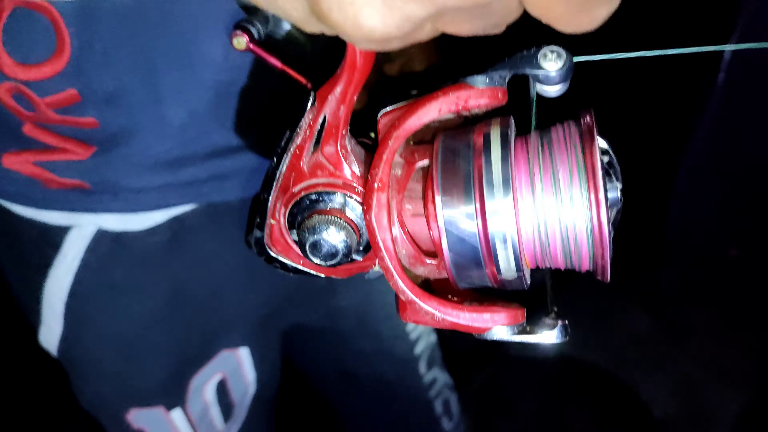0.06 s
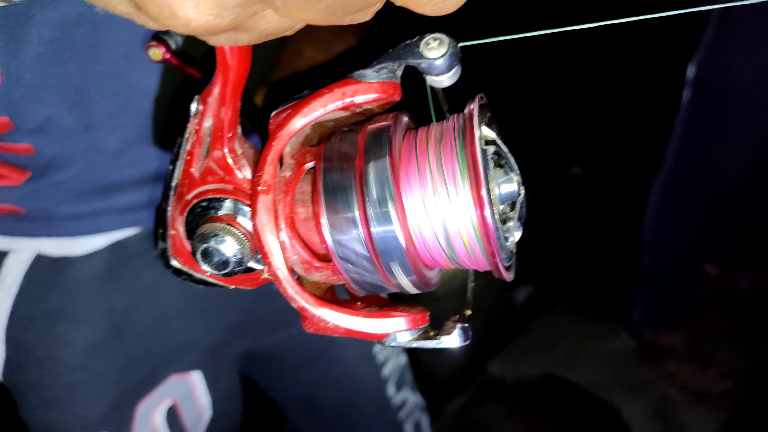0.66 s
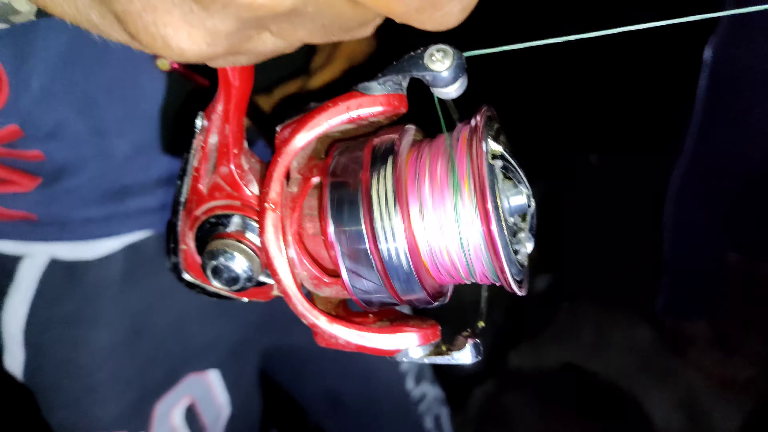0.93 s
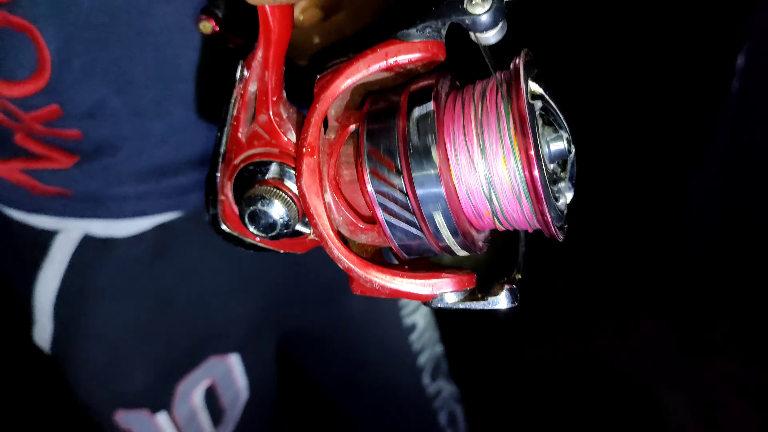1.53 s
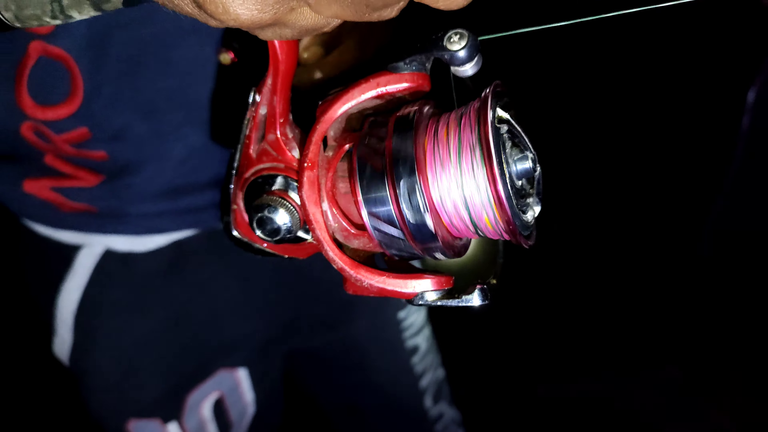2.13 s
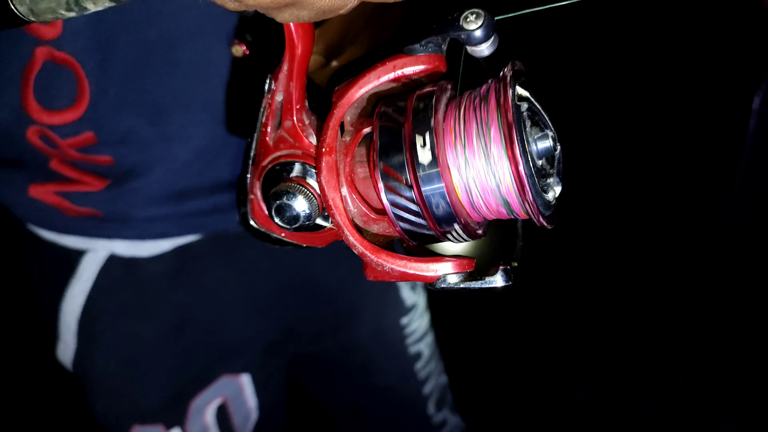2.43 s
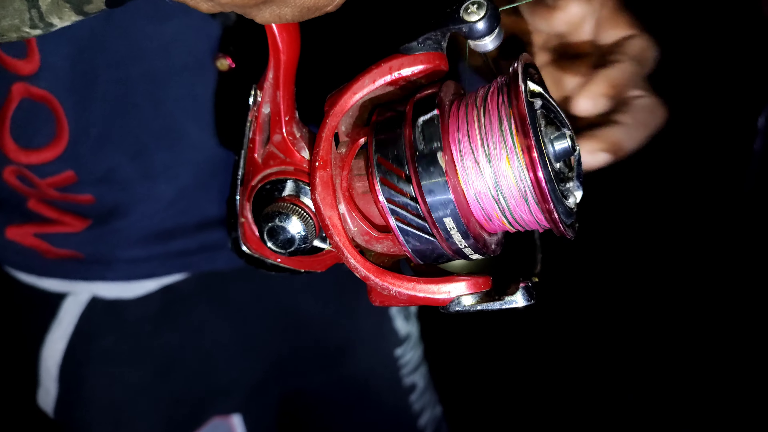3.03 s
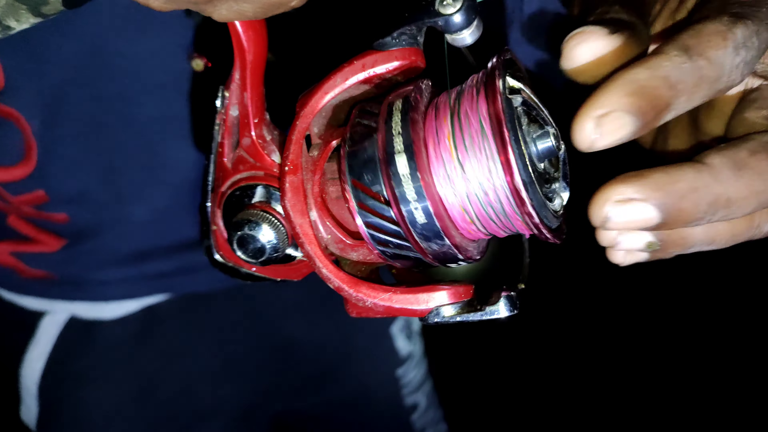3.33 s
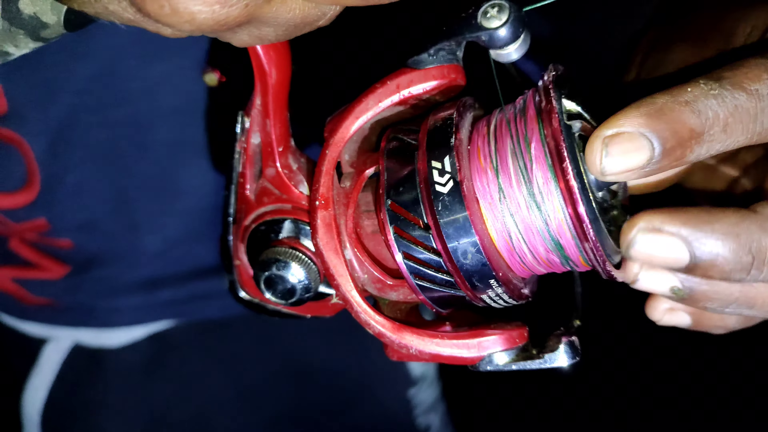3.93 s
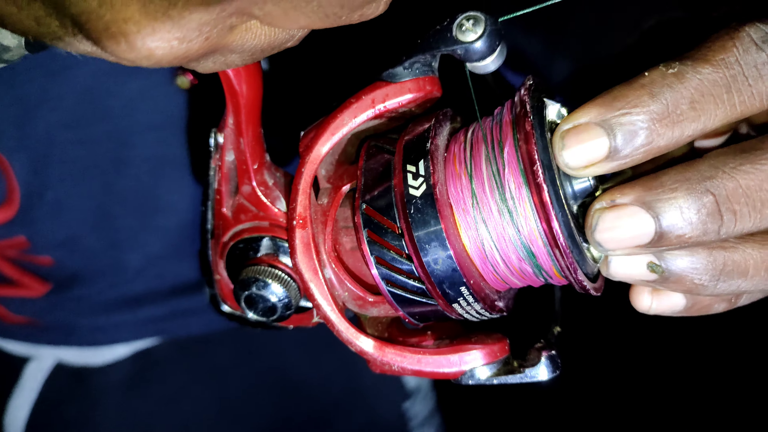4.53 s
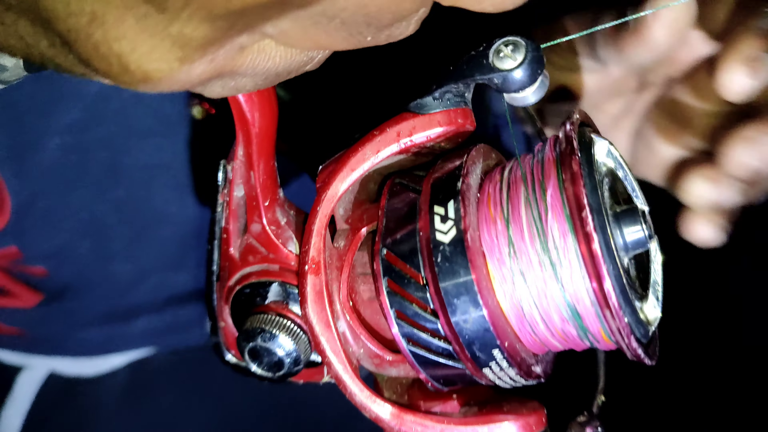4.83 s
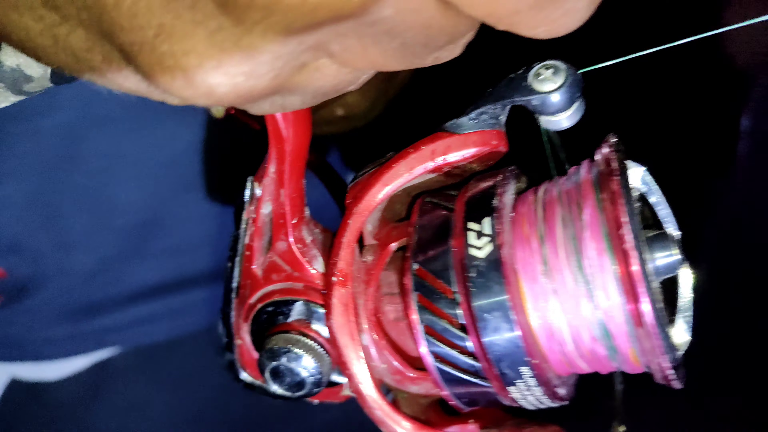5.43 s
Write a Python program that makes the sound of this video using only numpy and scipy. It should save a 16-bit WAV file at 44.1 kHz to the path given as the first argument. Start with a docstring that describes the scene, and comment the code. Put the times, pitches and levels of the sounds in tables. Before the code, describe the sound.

A fishing reel's drag clicker buzzes from the start, close and mostly on the right, bright and metallic as line runs off. It slows in uneven surges, becoming a rattle by 1.5 seconds and quieter, separate ticks by 3, with the last few trailing off around 4 seconds. A hand knocks the microphone with low thumps and rumble between 0.8 and 2.7 seconds, loudest at 1.1. Two smaller snaps come near 1.8 and 2.1 seconds. From 4.1 to 4.5 seconds the drag knob gives four loud, sharp snaps. A finger taps the rod dryly at 5.2 seconds, and a soft bump and one last tick follow around 5.6. Throughout, quieter in the background, a frog pulses five or six rattling calls a second, while insects chirp high over a distant, shimmering waterside night chorus.

```python
"""A fishing reel's drag clicker buzzes, slows to single ticks and stops as line runs off, by the water
at night. Each tooth flicks a pawl that rings spring and spool. Fingers turn the drag knob in four
sharp snaps and tap the rod; a hand bumps the camera, whose right microphone is nearest the reel.
Behind, a frog pulses its vocal sac in five or six calls a second; insects chirp over a far chorus."""
import sys
import numpy as np
from scipy import signal
from scipy.fft import rfft, irfft, next_fast_len
from scipy.io import wavfile
from scipy.ndimage import map_coordinates

SR = 44100
rng = np.random.default_rng(int(sys.argv[2]) if len(sys.argv) > 2 else 0)


def master_out(mix):
    """Clip the mix to full scale and print it as 16-bit PCM to the path in sys.argv[1]."""
    frames = np.transpose(np.atleast_2d(mix))
    ceiling = np.clip(frames, -1, 1)
    pcm = np.round(ceiling * 32767).astype(np.int16)
    wavfile.write(sys.argv[1], SR, pcm)


N = 250884


def drag_clicker():
    """Each tooth flicks the pawl: a crack, a rebound, and the ring of spring and spool."""
    # Line runs off in surges. Each row: time in seconds, clicks per second.
    click_rate = [(0.0, 156.4), (0.27, 118.5), (0.32, 152.5), (0.38, 89.9), (0.59, 91.9), (0.65, 63.2),
                  (0.9, 75.8), (1.05, 46.7), (1.12, 68.5), (1.19, 55.9), (1.28, 78.0), (1.4, 48.6),
                  (1.55, 39.6), (1.59, 28.7), (1.69, 26.0), (1.84, 46.8), (1.88, 36.4), (2.11, 33.4),
                  (2.22, 53.3), (2.32, 45.0), (2.38, 49.3), (2.55, 25.7), (2.63, 29.5), (2.73, 19.2),
                  (3.03, 18.2), (3.27, 15.0), (3.32, 20.1), (3.58, 18.5)]
    # The clicks grow quieter. Each row: time in seconds, level in dB.
    click_level = [(0, -24), (.2, -24), (.55, -26), (1.4, -26), (1.7, -28), (2.4, -29.5), (3.2, -31.5),
                   (3.56, -29.5)]
    # Spool almost at rest. Each row: start in seconds, level in dB.
    lone_ticks = [(3.6294, -30), (3.7255, -28.5), (3.878, -29), (4.142, -31), (5.657, -26.5)]
    # Clicker spring and metal spool. Each row: frequency in Hz, level in dB, t60 in seconds.
    spring_modes = [(3843, -15, .26), (3940, -17, .22), (4390, -1.5, .045), (4490, -13, .025),
                    (6288, -13, .08), (6570, -11.5, .08), (6870, -7, .03), (7440, -17, .03)]
    spool_modes = [(10350, -33, .05), (10845, -27, .055), (11945, -16, .065), (12865, -16, .055),
                   (13700, -32, .03)]
    # Pawl crack. Each row: frequency in Hz, level in dB.
    crack_spectrum = [(900, -27.5), (2000, -11), (2600, -20), (3400, -11.5), (4400, -0.5), (5500, -10.5),
                      (6800, 1), (7400, -7), (8200, -29), (9700, -39), (13000, -12.5), (14500, -59)]
    tooth_scatter_db, damping_db_per_hz = 1.1, .038
    teeth_s = beats(click_rate)
    running = np.c_[teeth_s, np.interp(teeth_s, *np.transpose(click_level))]
    times_s, db = np.vstack([running, lone_ticks]).T
    sizes = amp(db + tooth_scatter_db * rng.standard_normal(len(db)))
    blows, t = np.zeros(N), np.arange(SR // 40) / SR
    for start_s, size in zip(times_s, sizes):
        since_rebound_s = t - rng.uniform(.0016, .0039)
        rebound = .4 * (since_rebound_s > 0) * fade(np.abs(since_rebound_s), .02)
        add(blows, start_s, size * (1 - fade(t, .00099)) * (fade(t, .013) + rebound))
    # At speed the next tooth damps the ring.
    ring_sizes = sizes * amp(-damping_db_per_hz * np.interp(times_s, *np.transpose(click_rate)))
    line_hiss = amp(curve([(0, -35.5), (.14, -37), (.3, -72.5)]))  # at full speed only
    spring = struck(spring_modes, times_s, ring_sizes, scatter_db=3, rise_s=.0025)
    clicker = amp(2) * spring + (amp(2) * blows + line_hiss) * noise(crack_spectrum)
    spool = amp(-.7) * struck(spool_modes, times_s, ring_sizes, scatter_db=5, rise_s=.005)
    direct = placed(clicker, left_db=-63, lag_s=.00038) + placed(spool, left_db=5.5, lag_s=.0002)
    return direct + amp(-20) * echoes(clicker, t60_s=.027)


def reel_snaps():
    """The drag knob's detent snaps over in about a millisecond; one ratchet click rings duller."""
    # One duller click of the ratchet, then sharp snaps.
    # Each row: start in seconds, level in dB, low ring in dB, left gain in dB.
    snaps = [(1.114, -28, 5, -14), (1.7689, -15.5, -15, -22), (2.0553, -19, -5, -18),
             (4.1286, 2.5, -30, -11.5), (4.2445, 2, -34, -24), (4.4414, 1.5, -16, -20),
             (4.4889, -1.5, -16.5, -6)]
    # Detent and low ring. Each row: frequency in Hz, level in dB, t60 in seconds.
    detent_modes = [(4510, -8.5, 0.0044), (5950, -3.5, 0.0041), (6230, -5, 0.0047), (8840, -16, 0.004),
                    (11020, -20, 0.0063), (12010, -9, 0.0038)]
    low_modes = [(2104, -22, .0026), (3420, 1, .009)]
    low_cut_hz = 1500  # a small knob radiates little bass
    out, t = np.zeros((2, N)), np.arange(SR // 30) / SR
    grit = noise([(500, -14), (2000, -25), (4500, 9), (7000, 0), (9500, -2), (12500, 17), (16000, -18)])
    for start_s, db, low_db, left_db in snaps:
        scratch = amp(-9.5) * grit[round(start_s * SR):][:len(t)] * fade(t, .0098)
        ringing = ring(detent_modes, t) + amp(low_db) * ring(low_modes, t)
        snap = amp(db + 4.5) * (ringing + scratch) * (1 - fade(t, .0015)) ** 2
        add(out[1], start_s, snap)
        add(out[0], start_s + .00027, amp(left_db) * snap)
    out = filtered(out, lambda hz: hz / np.hypot(hz, low_cut_hz))
    return out + amp(-26.5) * echoes(out[1], t60_s=.091)


def rod_taps():
    """A finger taps the rod, which answers with a dry tick."""
    # Each row: start in seconds, level in dB.
    taps = [(5.1678, -20), (5.1785, -6)]
    # Each row: frequency in Hz, level in dB, t60 in seconds.
    rod_modes = [(860, -17, 0.0057), (2160, -4, 0.0044), (3140, 2, .0035), (4910, -3, 0.0027)]
    out, t = np.zeros(N), np.arange(SR // 50) / SR
    for start_s, db in taps:
        add(out, start_s, amp(db) * ring(rod_modes, t) * (1 - fade(t, .0021)) ** 2)
    return placed(out, left_db=-20)


def hand_bumps():
    """Bumps knock the camera's case and push it for a cycle or so, over the lumpy rumble of the grip."""
    # Each row: start in seconds, level in dB, push frequency in Hz, relative crack level in dB.
    bumps = [(.83, -24, 120, -14), (.909, -14, 55, -17), (1.1345, -1, 92, 5), (1.23, -23, 55, -30),
             (1.343, -19, 38, -11), (1.497, -19, 62, -13), (1.677, -22, 100, -2), (2.2345, -24, 110, -7),
             (2.275, -20.5, 105, -13), (2.663, -24, 60, -34), (3.736, -26, 66, -32),
             (5.591, -19.5, 110, -4)]
    # Each row: frequency in Hz, level in dB, t60 in seconds.
    case_modes = [(375, -3, .012), (684, 2, 0.0073), (844, 2, 0.0068), (1322, -11, 0.0077),
                  (1800, 1, 0.0045)]
    # Crack of a contact. Each row: frequency in Hz, level in dB.
    contact_spectrum = [(300, 19), (700, -2.5), (1100, -8.5), (2200, 14), (3200, 10.5), (5000, 3),
                        (7200, -11), (8500, -41), (15000, -30)]
    # Shifting grip. Each row: time in seconds, level in dB.
    grip = [(0, -47), (.7, -53.5), (.8, -32), (1, -38.5), (1.4, -34), (1.95, -50), (3, -51.5),
            (5.45, -54.5), (5.6, -38)]
    flex_delay_s = .002  # the case gives way after the contact
    knocks, cracks, t = np.zeros(N), np.zeros(N), np.arange(SR // 10) / SR
    for start_s, db, hz, crack_db in bumps:
        push = np.cos(2 * np.pi * hz * t) * fade(t, 2.34 / hz) * (1 - fade(t, .55 / hz)) ** 2
        add(knocks, start_s + flex_delay_s, amp(db + 4) * push)
        add(knocks, start_s, -amp(db + crack_db - 10.5) * ring(case_modes, t))
        add(cracks, start_s, amp(db + crack_db - 5.5) * fade(t, .0058))
    grip_gain = amp(curve(grip) + 2.9 * wobble(18))
    rumble = grip_gain * noise([(18, 1.5), (35, 1), (80, -6.5), (180, -18.5), (400, -32), (900, -36.5)])
    return placed(knocks + cracks * noise(contact_spectrum) + rumble, left_db=-22.5)


def frog():
    """Each call is a rattle of pulses that ring the vocal sac; the banks smear it."""
    # Each row: time in seconds, calls per second.
    call_rate = [(-.05, 5.37), (1.03, 5.77), (2.58, 5.23), (2.86, 6.21), (3.62, 5.21), (4.03, 6.15),
                 (4.28, 5.37), (5.12, 5.0), (5.3, 5.9), (5.69, 5.0)]
    # Bursts of one call. Each row: offset in seconds, pulse count, level in dB.
    bursts = [(0, 3, 1), (0.034, 1, -0.5), (0.05, 2, 2), (.069, 5, 1.5)]
    # Each row: frequency in Hz, level in dB, t60 in seconds.
    sac_modes = [(1605, 0, .027), (1780, -14, .015), (2240, -17, .02)]
    pulse_period_s, sac_rise_s = .00815, .011
    voice, t = np.zeros(N), np.arange(SR // 36) / SR
    pulses = [(s + k * pulse_period_s, db) for s, count, db in bursts for k in range(round(count))]
    for start_s in beats(call_rate):
        for offset_s, db in pulses:
            late, loud, sharp = rng.standard_normal(3)
            jitter_s = .03 * (offset_s + .01) * late
            pulse = ring(sac_modes, t, pitch_ratio=1 + .023 * sharp) * (1 - fade(t, sac_rise_s))
            add(voice, start_s + offset_s + jitter_s, amp(db + .69 * loud) * pulse)
    voice = amp(-39.2) * unit(voice)
    return placed(voice, left_db=-6.3, lag_s=-.00016) + amp(-11) * echoes(voice, t60_s=.1)


def insects():
    """Each nearby insect is a narrow buzz that swells and stops at its own pace."""
    # Each row: pitch in Hz, width in Hz, level in dB, then period, chirp length and
    # middle of one chirp in seconds.
    chirpers = [(7190, 200, -49, .2155, .11, 4.705), (11700, 1100, -64, .33, .2, 4.83),
                (3080, 110, -55.5, .245, .06, 5.11)]
    out, t = np.zeros(N), np.arange(N) / SR
    for hz, width_hz, db, period_s, length_s, middle_s in chirpers:
        from_middle_s = (t + .014 * wobble(2.77) - middle_s + period_s / 2) % period_s - period_s / 2
        swell = np.exp(-(2 * from_middle_s / length_s) ** 4)
        buzz = noise([(hz - 2 * width_hz, -25), (hz - width_hz / 2, -3), (hz, 0),
                      (hz + width_hz / 2, -3), (hz + width_hz, -20)])
        out += amp(db) * swell * buzz
    return placed(out, left_db=-23.5, lag_s=.00042)


def far_chorus():
    """Far frogs and insects merge into a shimmering noise bed over still air."""
    # Chorus on each side, and night air. Each row: frequency in Hz, level in dB.
    left_spectrum = [(1000, -36), (1350, -8), (1600, -2.5), (1950, -14.5), (2280, -0.5), (2600, -79),
                     (3050, -14.5), (3900, -18.5), (5000, -51), (5800, -49), (7000, -8), (7600, -22.5),
                     (8500, -6.5), (9700, -32.5)]
    right_spectrum = [(1000, -48), (1350, -8), (1600, 0), (1950, -5.5), (2280, -2.5), (2600, -23.5),
                      (3050, -5.5), (3300, -13), (3800, -2), (4800, -17), (5800, -17), (6900, -5.5),
                      (7700, -32.5), (9000, -14.5)]
    air_spectrum = [(20, 7.5), (70, 1.5), (200, -8), (400, -18.5), (1000, -21.5), (5000, -24.5),
                    (9800, -64), (11700, -27), (12600, -31), (14200, -35), (15000, -63)]
    chorus = [amp(db + 1.57 * wobble(25) + 1.2 * wobble(3.42)) * noise(spectrum)
              for db, spectrum in [(-47, left_spectrum), (-42, right_spectrum)]]
    air_mid, air_side = amp(-53.5) * noise(air_spectrum), amp(-58) * noise(air_spectrum)
    return np.array(chorus) + [air_mid + air_side, air_mid - air_side]


def struck(modes, times_s, sizes, scatter_db, rise_s):
    """Modes ring on from blow to blow; each blow shares its force anew and takes a moment to build."""
    out = np.zeros(N)
    at = np.clip(np.round(times_s * SR), 0, N - 1).astype(int)
    for hz, db, t60_s in modes:
        blows = np.bincount(at, sizes * amp(db + scatter_db * rng.standard_normal(len(at))), N)
        out += resonator(resonator(blows, hz, rise_s), hz, t60_s)
    return 2 * (1 - fade(1 / SR, rise_s)) * out


def resonator(x, hz, t60_s):
    """One damped mode; a unit blow rings it at size 1."""
    r, w = fade(1 / SR, t60_s), 2 * np.pi * hz / SR
    return signal.lfilter([.5, 0, -.5], [1, -2 * r * np.cos(w), r * r], x)


def ring(modes, t, pitch_ratio=1):
    """Damped modes set going by one blow."""
    hz, db, t60_s = np.transpose(modes)[:, :, None]
    return np.sum(amp(db) * fade(t, t60_s) * np.sin(2 * np.pi * hz * pitch_ratio * t), axis=0)


def beats(rows):
    """Event times in seconds from a (seconds, events per second) curve."""
    s, rate_hz = np.transpose(rows)
    t = np.arange(s[0], s[-1], 1 / SR)
    turns = np.cumsum(np.interp(t, s, rate_hz)) / SR
    return np.interp(np.arange(int(turns[-1]) + 1), turns, t)


def noise(spectrum):
    """Noise of rms 1 with an (Hz, dB) spectrum that falls steeply past its ends."""
    f, db = np.transpose(spectrum)
    log_f, db = np.log(np.r_[f[0] / 2, f, f[-1] * 1.2]), np.r_[-120, db, -120]
    return unit(filtered(rng.standard_normal(N), lambda hz: amp(np.interp(np.log(hz + 1), log_f, db))))


def placed(x, left_db, lag_s=0):
    """Stereo pair; gain and lag apply to the left microphone."""
    n = np.arange(N)
    return np.array([amp(left_db) * np.interp(n - np.round(lag_s * SR), n, x), x])


def echoes(x, t60_s):
    """Diffuse scatter from the surroundings, independent at each microphone."""
    t = np.arange(SR // 6) / SR
    tail = rng.standard_normal((2, len(t))) * fade(t, t60_s)
    return signal.oaconvolve(x[None], tail / np.linalg.norm(tail[0]), axes=1)[:, :N]


def filtered(x, response):
    """Apply a gain given as a function of Hz."""
    size = next_fast_len(N + 4096, True)
    return irfft(rfft(x, size) * response(np.fft.rfftfreq(size, 1 / SR)), size)[..., :N]


def wobble(rate_hz):
    """Smooth random curve, rate_hz knots a second."""
    at = np.arange(0, N + 64, 64)
    knots = rng.standard_normal(int(N * rate_hz / SR) + 4)
    return np.interp(np.arange(N), at, map_coordinates(knots, [at * rate_hz / SR]))


def curve(rows):
    """One value per sample from (seconds, value) rows."""
    return np.interp(np.arange(N) / SR, *np.transpose(rows))


def add(track, start_s, sound):
    """Mix a sound into a track."""
    start = round(start_s * SR)
    sound = sound[max(-start, 0):max(N - start, 0)]
    track[max(start, 0):][:len(sound)] += sound


def fade(t, t60_s):
    """Exponential decay, 60 dB in t60_s."""
    return np.exp(-np.log(1000) * t / t60_s)


def amp(db):
    """Decibels to gain."""
    return 10 ** (np.asarray(db) / 20)


def unit(x):
    """Scale to rms 1."""
    return x / np.sqrt(np.mean(x ** 2) + 1e-20)


def scene():
    """Reel, rod and hand close by, the animals beyond."""
    return drag_clicker() + reel_snaps() + rod_taps() + hand_bumps() + frog() + insects() + far_chorus()


def record(dry):
    """Hard limit at full scale, then a steep low-pass."""
    cutoff_hz = 15800
    return filtered(np.clip(dry, -1, 1), lambda hz: 1 / np.sqrt(1 + (hz / cutoff_hz) ** 120))


dry = scene()
out = record(dry)
master_out(out)
```